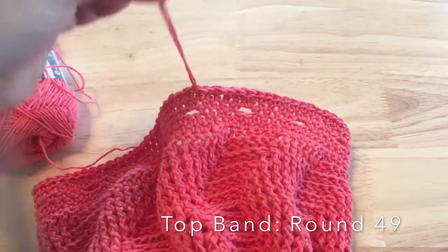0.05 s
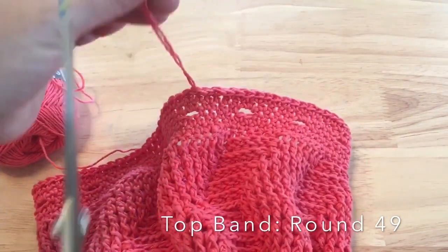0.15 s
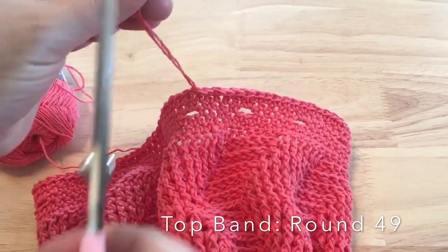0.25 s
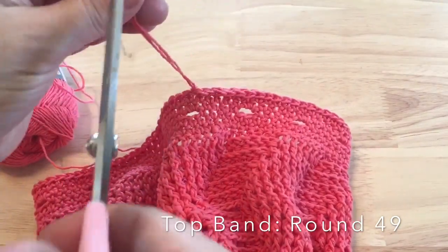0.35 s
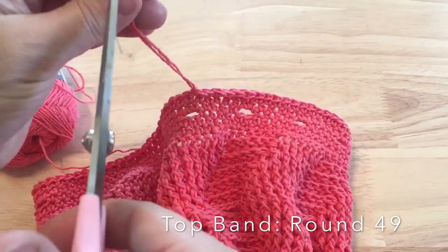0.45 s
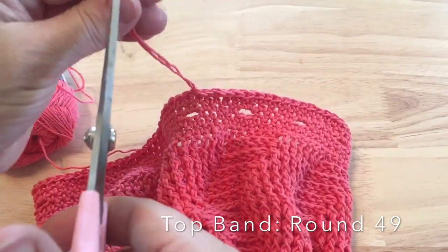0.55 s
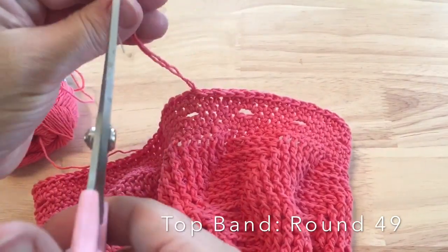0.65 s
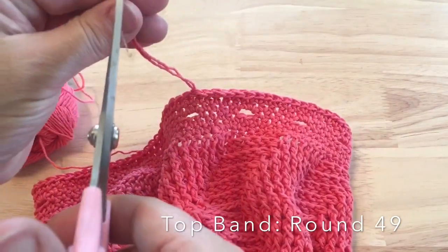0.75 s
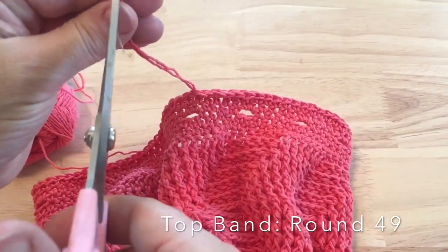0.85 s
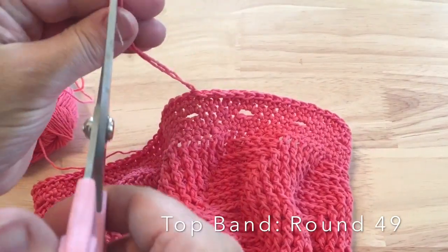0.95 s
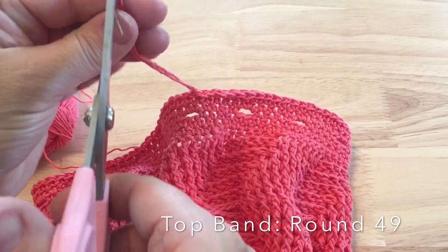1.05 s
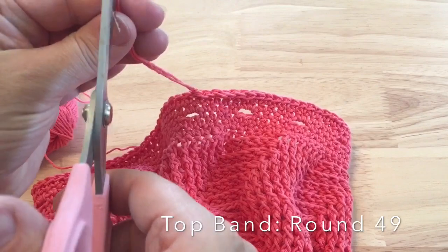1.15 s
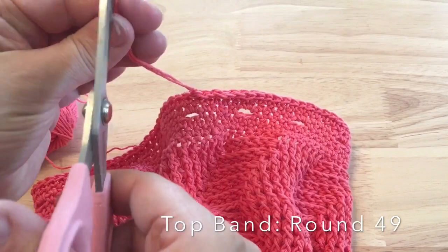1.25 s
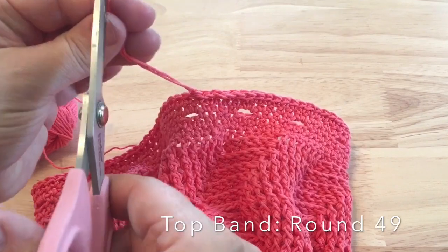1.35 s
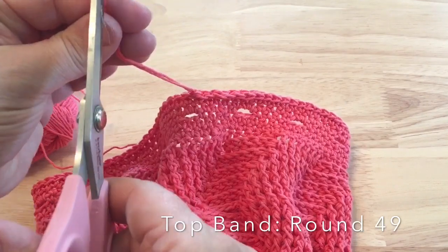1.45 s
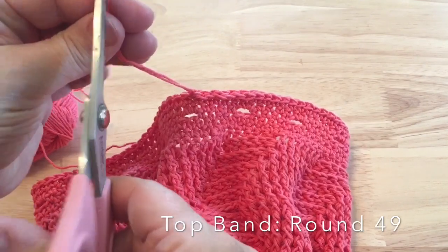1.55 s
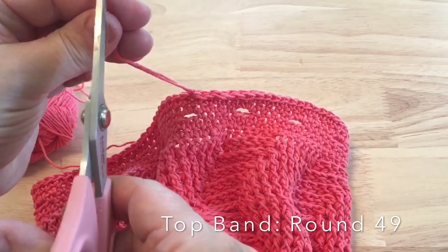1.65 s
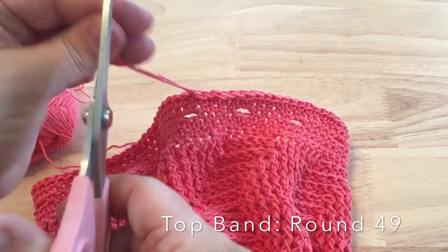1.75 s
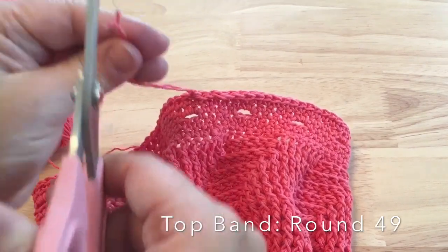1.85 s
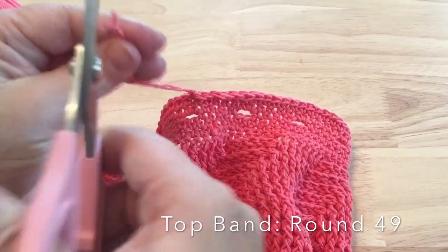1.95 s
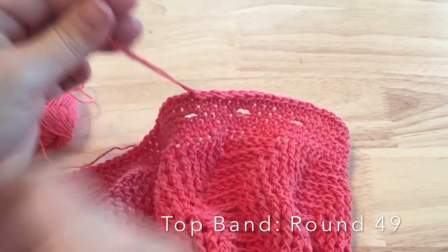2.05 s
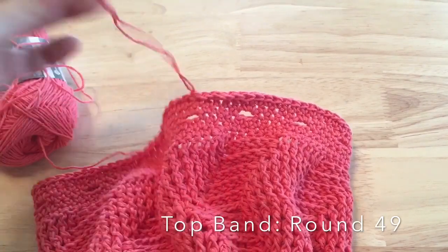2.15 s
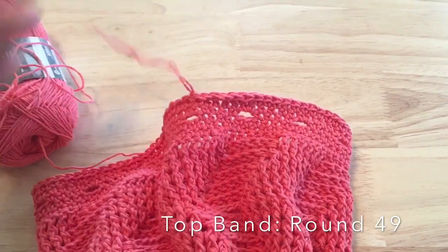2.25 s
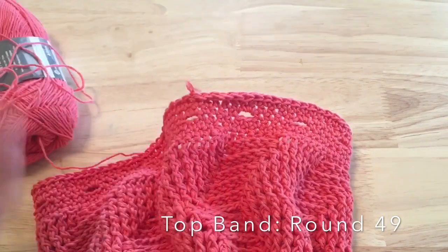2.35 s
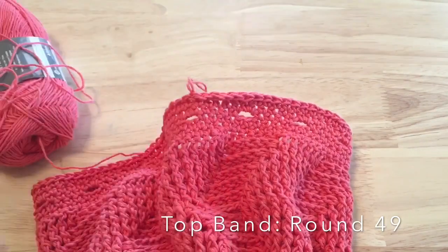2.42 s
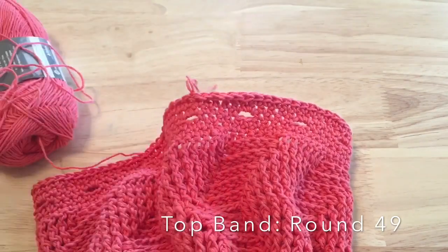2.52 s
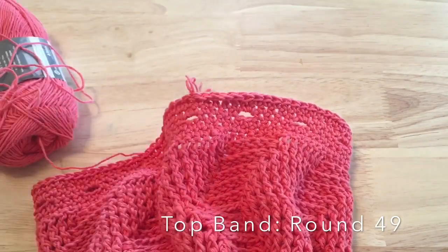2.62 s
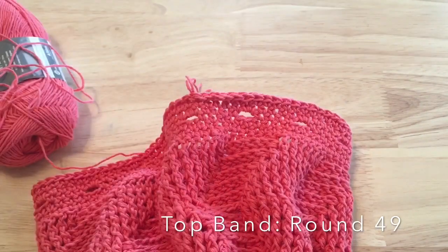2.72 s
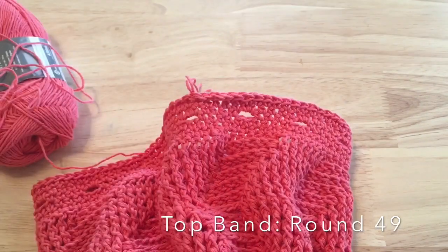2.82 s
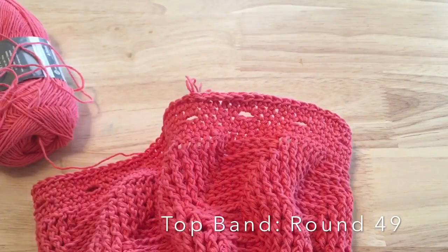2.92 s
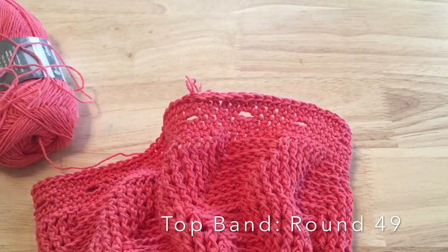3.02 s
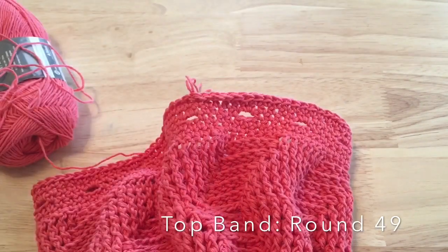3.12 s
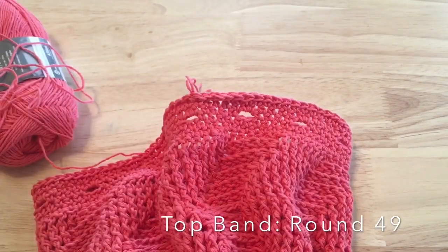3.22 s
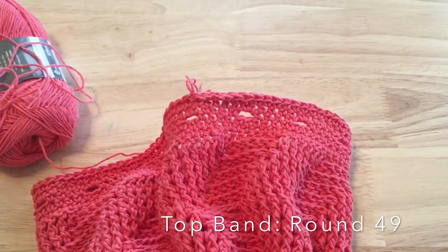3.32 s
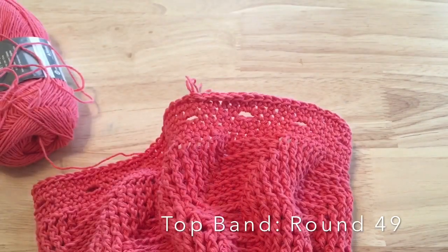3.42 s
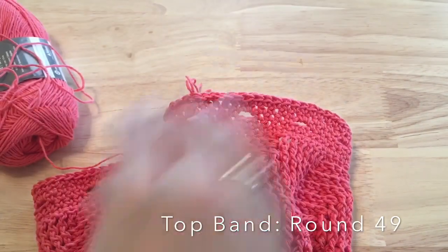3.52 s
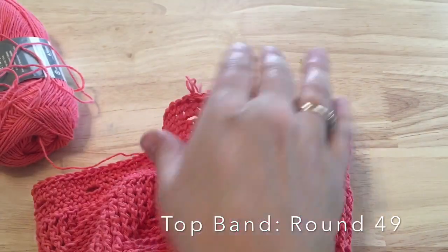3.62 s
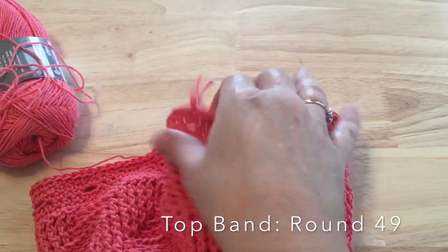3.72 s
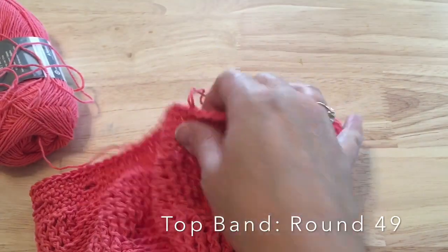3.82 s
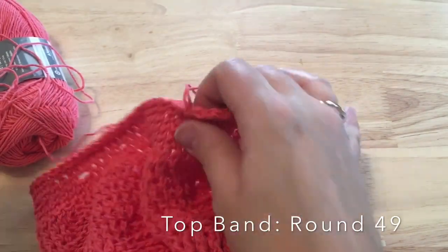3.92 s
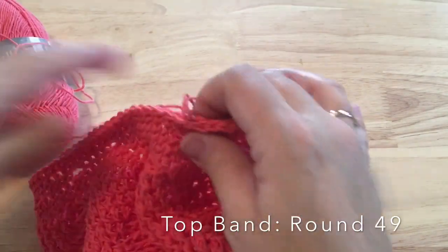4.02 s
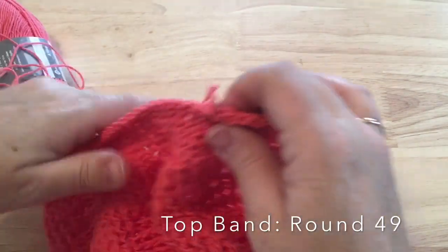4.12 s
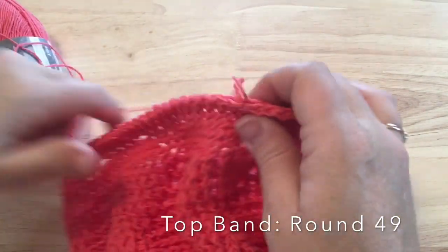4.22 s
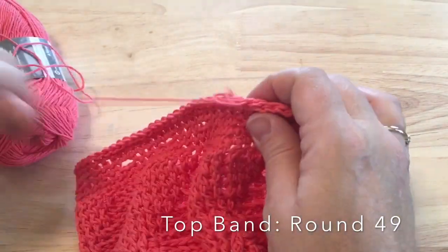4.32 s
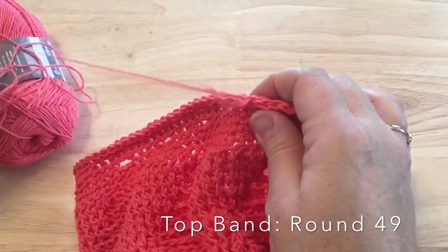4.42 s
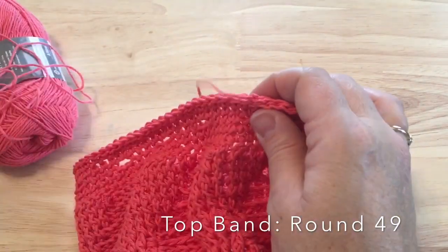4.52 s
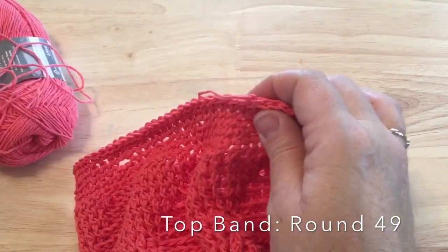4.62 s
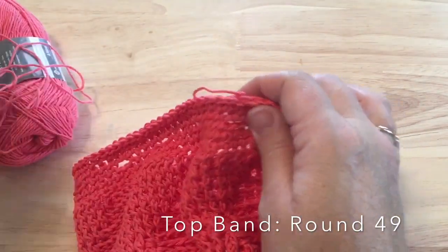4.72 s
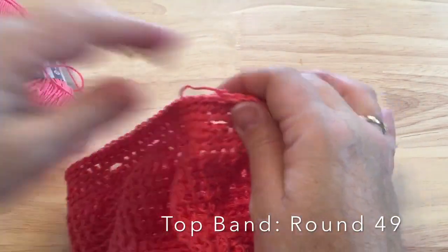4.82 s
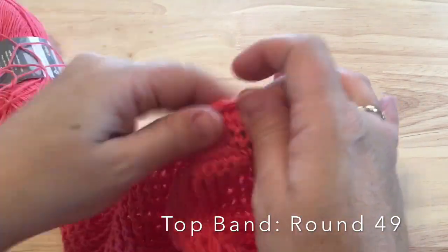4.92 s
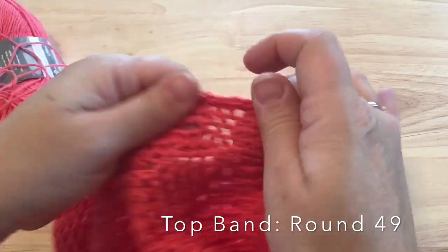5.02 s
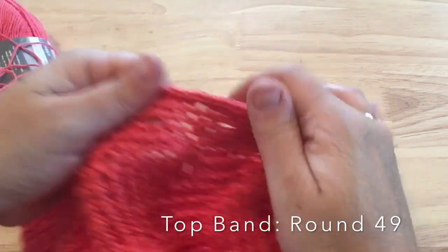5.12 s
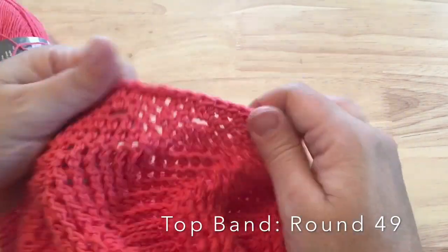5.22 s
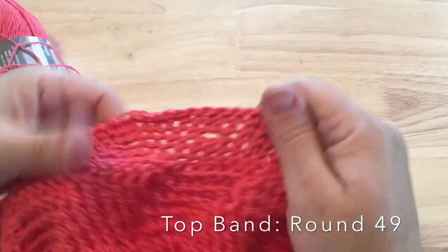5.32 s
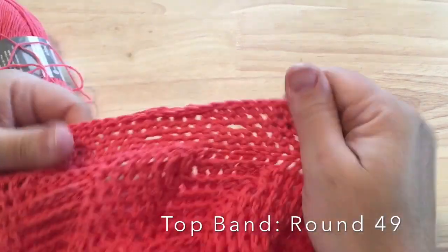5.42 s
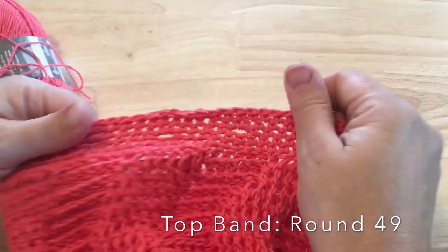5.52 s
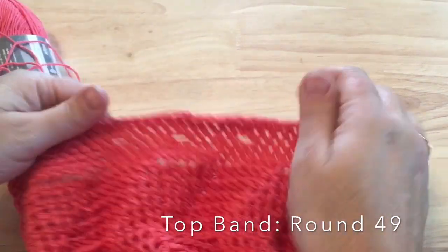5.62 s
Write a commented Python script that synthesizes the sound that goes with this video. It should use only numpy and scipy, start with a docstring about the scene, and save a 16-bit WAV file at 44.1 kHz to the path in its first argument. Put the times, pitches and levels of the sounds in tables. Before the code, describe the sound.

Scissors snip yarn sharply, then a lighter snip, two wooden knocks as they are set down, and crocheted cloth rustles softly over a low hum.

```python
"""Scissors cut a strand of yarn close to the microphone, over a wooden table in a small humming room.
The blades scrape shut and the handles clack; they shut once more, lightly, and are put down with two main knocks.
Hands pull the yarn end through and stretch the crocheted cloth, which rustles softly.
Friction is made of random tiny slips, and each hard touch is an impulse that rings decaying sine modes.
Wall echoes follow the near sounds; steady air noise and a wavering hum lie behind."""
import sys
import numpy as np
from scipy import signal
from scipy.fft import rfft, irfft
from scipy.io import wavfile

SR = 44100
rng = np.random.default_rng(int(sys.argv[2]) if len(sys.argv) > 2 else 0)


def int16_out(signal):
    """Quantize to a 16-bit WAV file."""
    q = np.round(np.clip(np.atleast_2d(signal).T, -1, 1) * 32767)
    wavfile.write(sys.argv[1], SR, q.astype(np.int16))


N = 249606

# Scissors closing to their stop. Each row: time in seconds, then levels in dB of the handle clack,
# the hollow finger loops, the blade tips, the push on the hand, the closing scrape and the pivot rattle.
CLOSINGS = [(1.6478, -15.5, -36, -20.5, -29.5, -34, -44), (2.239, -31, -27, -20.5, -41, -49, -38.5)]
# Plastic handles. Each row: mode in Hz, relative level in dB, t60 in seconds.
HANDLE_MODES = [(1474, 2, 0.0058), (2450, 2, 0.0074), (3420, 3.5, 0.0071), (4160, 5.5, 0.0028),
                (5500, -9, 0.0094)]
# Steel blades, damped by the fingers and each other. Each row: mode in Hz, relative level in dB, t60 in seconds.
BLADE_MODES = [(2740, -14, 0.0057), (3520, -7.5, 0.0044), (5800, -5, 0.0064), (6880, -3.5, 0.008),
               (8600, 4.5, 0.0027), (9950, 1.5, 0.0038), (11300, 2, 0.0042), (14900, 6, 0.0017)]


def from_db(db):
    """Decibels to gain."""
    return 10 ** (np.asarray(db) / 20)


def rms_one(x):
    """Scale to rms 1."""
    return x / np.sqrt(np.mean(x ** 2) + 1e-20)


def seconds():
    """The time of every sample."""
    return np.arange(N) / SR


def at_hz(points, hz, axis=1):
    """Read a column of a table along log frequency."""
    points = np.array(points)
    log_hz = np.log(np.maximum(hz, 1))
    return np.interp(log_hz, np.log(points[:, 0]), points[:, axis])


def coloured(x, spectrum):
    """Weight a steady sound by a spectrum in dB; rms 1."""
    gain = from_db(at_hz(spectrum, np.fft.rfftfreq(N, 1 / SR)))
    return rms_one(irfft(rfft(x) * gain, N))


def drift(rate_hz):
    """Slow random wandering with rms 1, losing its faster parts above the rate."""
    gain = 1 / (1 + (np.fft.rfftfreq(N, 1 / SR) / rate_hz) ** 2)
    return rms_one(irfft(rfft(rng.standard_normal(N)) * gain, N))


def click(s, db):
    """One impulse."""
    return from_db(db) * (np.arange(N) == round(s * SR))


def soften(x, hz):
    """A yielding contact passes less treble."""
    lowpass = signal.butter(2, min(hz, .45 * SR), fs=SR, output="sos")
    return signal.sosfilt(lowpass, x + 1e-18)


def ring(force, hz, t60):
    """A unit impulse sets a decaying sine of starting height 1 ringing."""
    r = from_db(-60 / (t60 * SR))  # decay per sample
    w = 2 * np.pi * hz / SR
    return signal.lfilter([0, np.sin(w)], [1, -2 * r * np.cos(w), r * r], force + 1e-18)


def body(force, modes):
    """Modes ring together, neighbours in opposite sense."""
    return sum((-1) ** k * from_db(db) * ring(force, hz, t60) for k, (hz, db, t60) in enumerate(modes))


def slips(per_s, spread_db):
    """Friction as tiny random slips of uneven size and either sign; rms 1."""
    sizes = from_db(spread_db * np.minimum(rng.exponential(1, N), 4))
    happens = rng.random(N) < per_s / SR
    return rms_one(sizes * rng.choice([-1, 1], N) * happens)


def swell(s, rise, fall, db):
    """A rub builds up to its hardest moment and lets go, along a bell with two unequal sides."""
    t = seconds()
    width = np.where(t < s, rise, fall)
    return from_db(db) * np.exp(-np.minimum(((t - s) / width) ** 2, 60))


def stroke(start, hold, db, attack, release):
    """A surface breaks loose, slides and comes to rest."""
    t = seconds() - start
    return from_db(db) * np.clip(t / attack, 0, 1) * np.exp(-np.clip((t - hold) / release, 0, 60))


def snips(rebound_s=.00065, rebound_db=-5, loop_hz=750, loop_t60=0.0092, hand_hz=110, hand_t60=0.044):
    """The handles meet, the tips flick past and rebound twice, and the hand takes a dull push."""
    out = 0
    for s, clack_db, loop_db, tip_db, push_db, *_ in CLOSINGS:
        tips = sum(click(s + rebound_s * k ** 0.98, tip_db + k * rebound_db) for k in range(3))
        out = out + body(click(s, clack_db), HANDLE_MODES) + body(tips, BLADE_MODES)
        out = out + ring(click(s, loop_db), loop_hz, loop_t60)
        out = out + ring(click(s, push_db), hand_hz, hand_t60)
    return out


def scrape(edge_db=-5, edge_t60=.005):
    """Edge rubs on edge in thousands of tiny slips, and the edge rings with them."""
    # Steel rubbing on steel. Each row: frequency in Hz, relative density in dB per Hz.
    steel_colour = [(700, -8.5), (1800, -10), (2400, -5), (2850, -6), (3500, -8.5), (4400, -17), (5700, -1),
                    (6600, -1.5), (8200, -10.5), (9600, -1), (10600, -5.5), (12000, 1.5), (14000, -6.5),
                    (16000, -6.5)]
    # The blades slide a little as the grip shifts. Each row: start in seconds, hold in seconds, level in dB.
    grip_slides = [(.159, 0.025, -47), (0.204, 0.021, -47), (0.469, 0.0071, -55), (1.814, 0.028, -55.5),
                   (2.214, .006, -52)]
    closing_hz, slide_hz = 6150, 13700  # how the edge sings in each motion
    peak_before_s, rise_s, fall_s = 0.0034, 0.013, 0.0068
    friction = slips(per_s=13000, spread_db=0.5)
    rub = coloured(friction, steel_colour)
    # a closing swells as the blades speed up, is hardest just before the stop and fades around it
    motions = [(swell(s - peak_before_s, rise_s, fall_s, db), closing_hz) for s, *_, db, _ in CLOSINGS]
    motions += [(stroke(*row, attack=0.0034, release=0.013), slide_hz) for row in grip_slides]
    motions += judder()
    out = 0
    for envelope, hz in motions:
        edge = rms_one(ring(friction, hz, edge_t60))
        out = out + envelope * (rub + from_db(edge_db) * edge)
    return out


def judder(count=4):
    """Before the second snip the blades stick and slip; each later slip is longer, weaker and higher."""
    s, gap_s, slowing, slip_share = 2.1542, 0.005, 1.44, .42
    first_db, loss_db, first_hz, climb_hz = -39.5, 2.5, 10200, 600
    run = []  # envelope and edge resonance in Hz of each slip
    for k in range(count):
        gap = gap_s * slowing ** k
        length = slip_share * gap
        envelope = swell(s, length / 2, length, first_db - k * loss_db)
        run.append((envelope, first_hz + k * climb_hz))
        s += gap
    return run


def rattle(pivot_hz=2600, pivot_t60=0.0058, die_s=0.015):
    """After each stop the loose pivot chatters briefly, rung by uneven slips."""
    t = seconds()
    shake = sum(from_db(db) * (t > s) * np.exp(-np.abs(t - s) / die_s) for s, *_, db in CLOSINGS)
    jolts = np.diff(slips(per_s=6900, spread_db=7.0), prepend=0)
    return shake * rms_one(ring(jolts, pivot_hz, pivot_t60))


def ticks():
    """Small catches of scissors and yarn tick in the blades and handles."""
    # Each row: time in seconds, bright tick in the blades in dB, dull tick in the handles in dB.
    catches = [(.103, -54, -63), (.115, -48, -65), (.1595, -48, -65), (.4675, -45.5, -56),
               (1.183, -49.5, -66), (1.2644, -47, -49.5), (1.3012, -44, -50), (1.431, -51, -60),
               (2.057, -45, -52), (2.1125, -44, -68), (4.3142, -30.5, -49), (4.809, -47, -51)]
    bright = sum(click(s, db) for s, db, _ in catches)
    dull = sum(click(s, db) for s, _, db in catches)
    return body(bright, BLADE_MODES) + body(dull, HANDLE_MODES)


def knocks(ring_db=-13, crack_db=-0.5, grain_db=-14, slow_lag_s=0.0064, grain_t60=.14):
    """Each touch cracks at the contact and rings the table top; yielding contacts are duller, stiff spots thinner."""
    # Touches on the table. Each row: time in seconds, strength in dB, brightness as a low-pass in Hz,
    # lowest frequency that the struck spot gives in Hz.
    touches = [(3.128, -44, 3000, 150), (3.388, -28, 348, 60), (3.4879, -11.5, 3600, 101),
               (3.6892, -39, 1280, 500), (3.6922, -20, 1890, 227), (3.6962, -12, 486, 320)]
    # Wooden table top. Each row: mode in Hz, relative level in dB, t60 in seconds.
    top_modes = [(135, -14, 0.37), (183, 0, 0.31), (296, -7, 0.18), (371, -10, 0.15), (506, -8, 0.13),
                 (592, -8, 0.13), (867, -14, 0.16), (937, -6, 0.13), (991, -15, 0.16), (1055, -21, 0.32),
                 (1130, -16, 0.17), (1168, -13, 0.15), (1238, -9, 0.12), (1367, -14, 0.22),
                 (1437, -10, 0.13), (1502, -5, 0.16), (1550, -12, 0.17), (1620, -3, 0.13),
                 (1755, -10, 0.12), (1803, -10, 0.19), (1868, -19, 0.23), (1938, -20, 0.22),
                 (2051, -3, 0.083), (2492, -18, 0.13), (2745, -5, 0.091), (3289, -18, 0.11)]
    # Brief crack at the point of contact. Each row: mode in Hz, relative level in dB, t60 in seconds.
    crack_modes = [(370, -13, 0.017), (770, -10.5, 0.027), (1170, 0, 0.01), (1566, 2, 0.012),
                   (2695, -8, 0.045), (4300, -11, 0.01), (5700, -3.5, 0.0026), (11200, 9, 0.00064)]
    # The table's crowded overtones. Each row: frequency in Hz, relative density in dB per Hz.
    overtone_colour = [(150, -12), (350, -3.5), (750, -0.5), (1050, -4), (1550, -2), (2300, -7),
                       (2850, -3.5), (3150, -16), (3700, -17.5), (4400, -21), (6000, -17), (12000, -30)]
    force = 0
    for s, db, hz, low_hz in touches:
        highpass = signal.butter(2, low_hz, "high", fs=SR, output="sos")
        force = force + signal.sosfilt(highpass, soften(click(s, db), hz))
    # long bending waves travel slowly, so the low modes sound a little later
    top = 0
    for k, mode in enumerate(top_modes):
        lag = round(slow_lag_s * SR * top_modes[0][0] / mode[0])
        top = top + (-1) ** k * np.roll(body(force, [mode]), lag)
    overtones = coloured(rng.standard_normal(N), overtone_colour) * from_db(-60 * seconds() / grain_t60)
    blur = signal.fftconvolve(force, overtones[:SR // 2])[:N]
    return from_db(ring_db) * top + from_db(crack_db) * body(force, crack_modes) + from_db(grain_db) * blur


def rustle(flutter_db=1.4, idle_db=-66.5, rise_share=0.45):
    """Countless fibres slip with each move of a hand, in small clumps as stitches pass the fingers."""
    # Yarn slides through the fingers or along the blades.
    # Each row: fastest moment in seconds, length scale of the move in seconds, level in dB.
    moves = [(0.056, 0.26, -55), (.52, .12, -62), (1.08, 0.22, -55.5), (1.276, 0.1, -54),
             (1.631, .022, -36), (2.085, 0.17, -56), (2.197, .03, -54), (2.234, 0.03, -43),
             (2.664, 0.16, -50.5), (3.16, 0.041, -59), (3.834, 0.17, -56), (4.049, 0.046, -47.5),
             (4.135, 0.33, -55.5), (4.35, 0.27, -48.5), (4.512, 0.11, -51.5), (4.687, 0.066, -48.5),
             (5.103, 0.28, -43.5), (5.29, 0.078, -46), (5.363, 0.07, -39), (5.516, 0.31, -43.5)]
    # Rubbed yarn. Each row: frequency in Hz, relative density in dB per Hz.
    yarn_colour = [(300, -10), (1500, -14.5), (3000, -7.5), (4700, -9), (5800, -5.5), (7800, -4.5),
                   (9700, 0), (10500, -4), (12500, 4.5), (16000, -3)]
    power = from_db(idle_db) ** 2  # the yarn is never quite still
    for s, length, db in moves:
        power = power + swell(s, rise_share * length, (1 - rise_share) * length, db) ** 2
    clumps = from_db(flutter_db * drift(50))
    return np.sqrt(power) * clumps * coloured(slips(per_s=10000, spread_db=2.5), yarn_colour)


def drag():
    """The stretched cloth drags over the table; stitches catch on the wood in sparser slips than the yarn's."""
    # Each row: start in seconds, hold in seconds, level in dB, attack in seconds.
    pulls = [(4.644, 0.13, -52.5, .004), (4.902, 0.046, -41.5, 0.023), (4.983, 0.064, -39.5, 0.069),
             (5.337, .018, -41, .004)]
    # Dragged cloth. Each row: frequency in Hz, relative density in dB per Hz.
    cloth_colour = [(400, -15), (1500, -25), (3000, -7.5), (4800, -2), (5500, 5), (6800, 7), (8000, 3.5),
                    (16000, 4)]
    pull = sum(stroke(*row, release=0.044) for row in pulls)
    return pull * coloured(slips(per_s=5800, spread_db=-1.5), cloth_colour)


def room(x, first_echo_s=0.0084):
    """Dense wall echoes arrive after a short gap, and each band of them dies at its own rate."""
    # Each row: frequency in Hz, t60 in seconds, echo level in dB.
    wall_decay = [(150, 0.16, -3.5), (700, 0.22, -13.5), (3000, 0.28, -21.5), (7050, 0.086, -19),
                  (14100, 0.19, -24)]
    t = np.arange(SR // 2) / SR
    edges = np.geomspace(70, 18000, 9)
    echo = 0
    for low, high in zip(edges, edges[1:]):
        centre = np.sqrt(low * high)
        decay = from_db(-60 * t / at_hz(wall_decay, centre)) * (t > first_echo_s)
        tail = rng.standard_normal(len(t)) * decay / np.linalg.norm(decay)
        band = signal.butter(2, [low, high], "band", fs=SR, output="sos")
        echo = echo + from_db(at_hz(wall_decay, centre, axis=2)) * signal.sosfilt(band, tail)
    return signal.fftconvolve(x, echo)[:N]


def background(waver=1.0, air_db=-52):
    """Steady room air and microphone hiss, with a fan's hum whose phase wavers (in radians rms)."""
    # Fan hum. Each row: tone in Hz, rms level in dB.
    hum_tones = [(150.7, -59.5), (226.1, -58.5)]
    # Room air and microphone hiss. Each row: frequency in Hz, relative density in dB per Hz.
    air_colour = [(15, -25), (40, -1.5), (80, -8), (150, -5.5), (240, -5), (340, -14), (480, -23.5),
                  (1400, -26.5), (2100, -22), (3100, -29.5), (4900, -34.5), (6000, -32), (8000, -35.5),
                  (14000, -31)]
    hum = 0
    for hz, db in hum_tones:
        phase = 2 * np.pi * hz * seconds() + waver * drift(15.6)
        hum = hum + from_db(db) * np.sqrt(2) * np.sin(phase)
    return hum + from_db(air_db) * coloured(rng.standard_normal(N), air_colour)


def scene():
    """Scissors, table and yarn close by, with the room around them."""
    near = snips() + scrape() + rattle() + ticks() + knocks() + rustle() + drag()
    return (near + room(near) + background())[None]


def record(dry):
    """The top is cut steeply, 60 dB down from 16700 Hz upward."""
    return signal.sosfilt(signal.cheby2(14, 60, 16700, fs=SR, output="sos"), dry)


dry = scene()
out = record(dry)
int16_out(out)
```